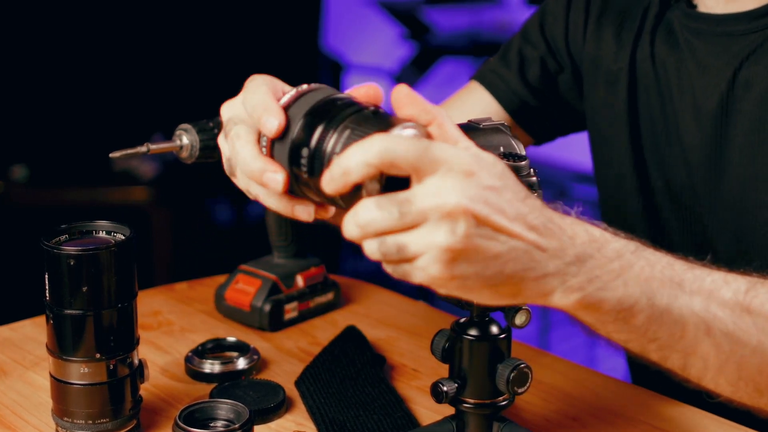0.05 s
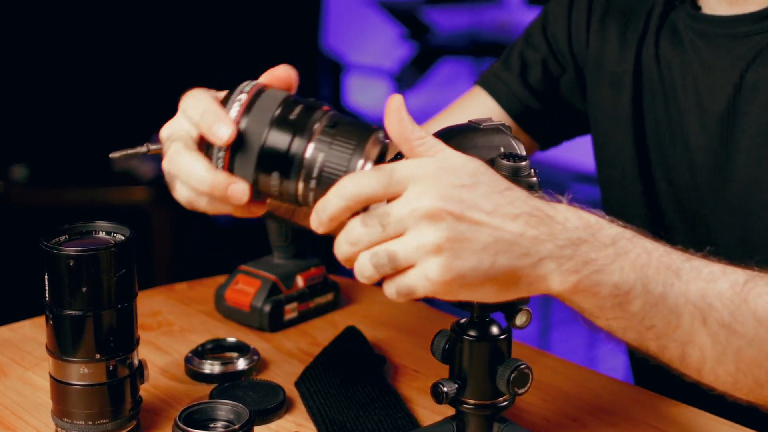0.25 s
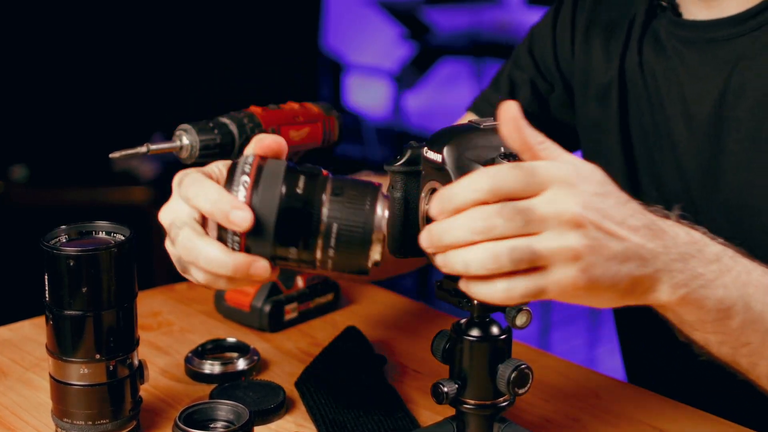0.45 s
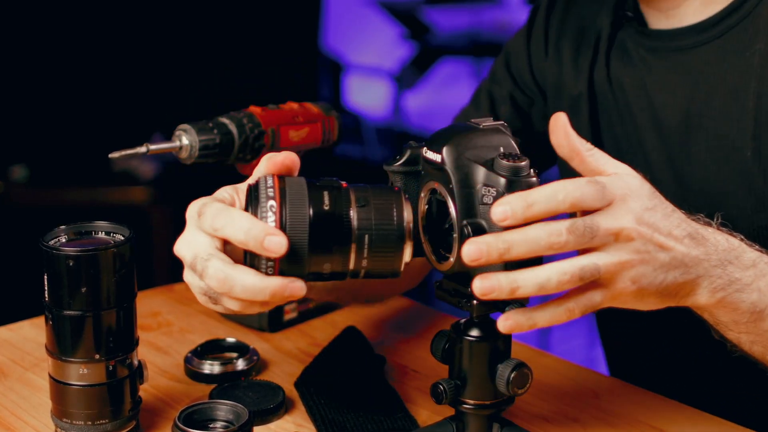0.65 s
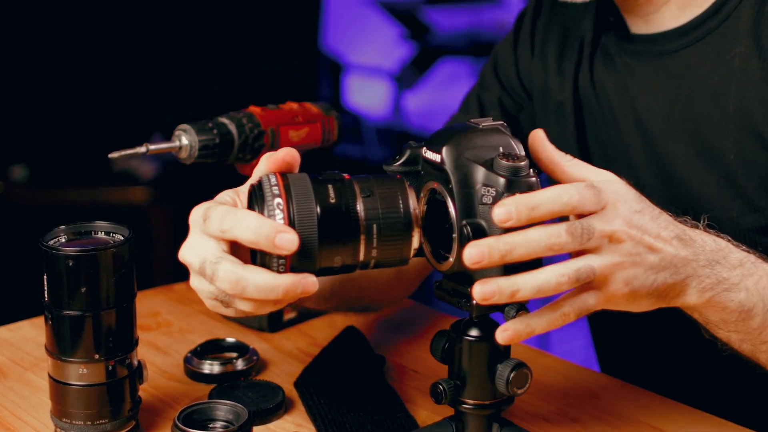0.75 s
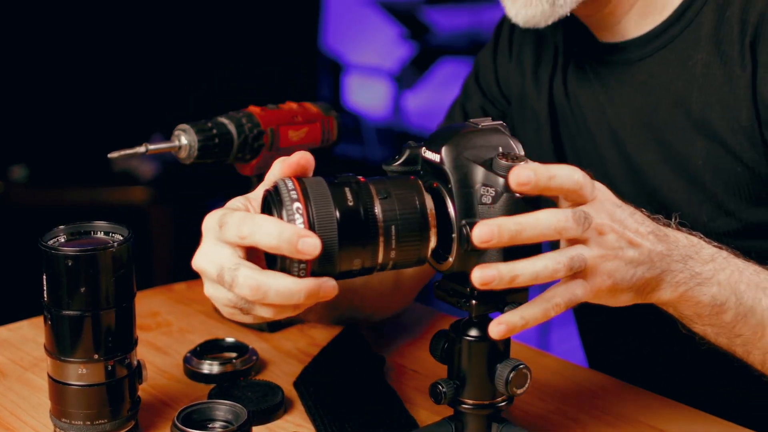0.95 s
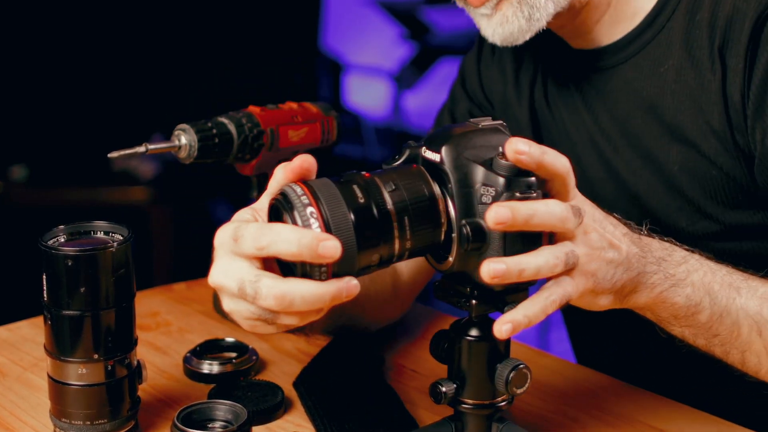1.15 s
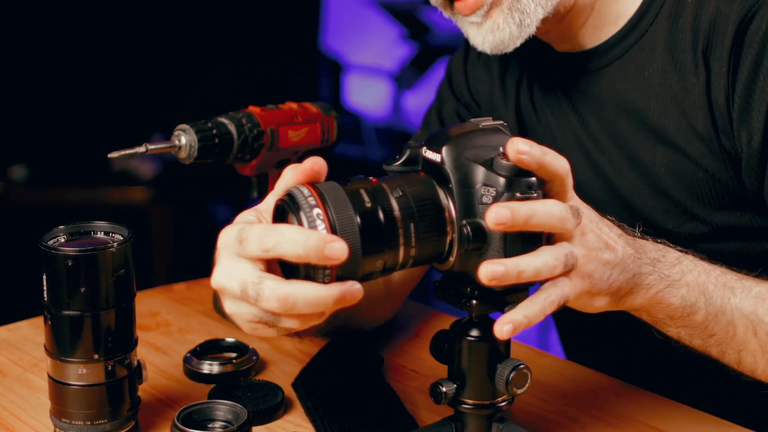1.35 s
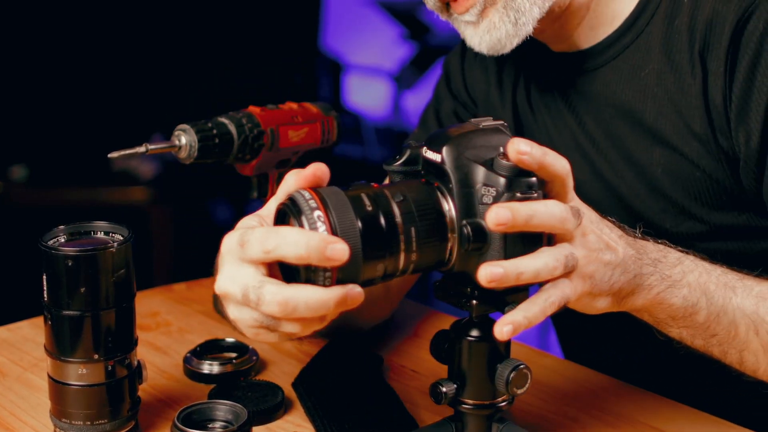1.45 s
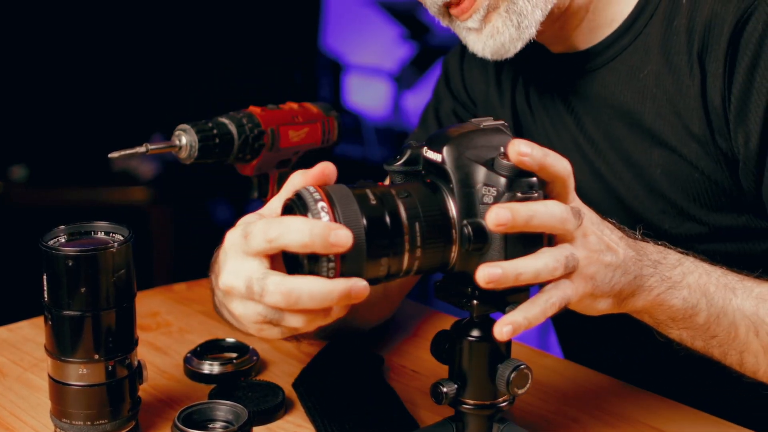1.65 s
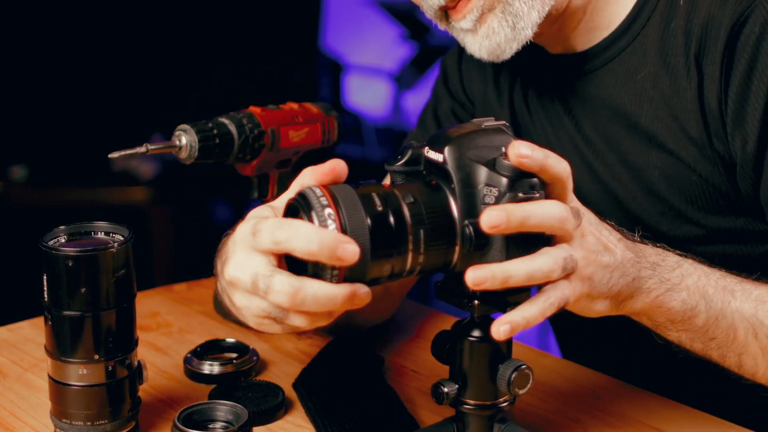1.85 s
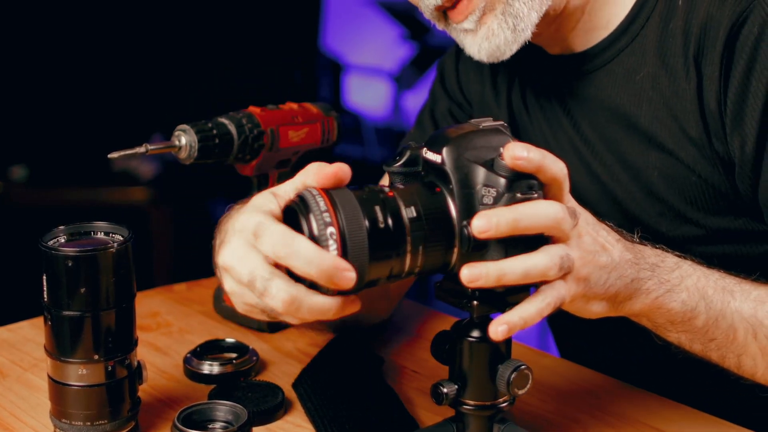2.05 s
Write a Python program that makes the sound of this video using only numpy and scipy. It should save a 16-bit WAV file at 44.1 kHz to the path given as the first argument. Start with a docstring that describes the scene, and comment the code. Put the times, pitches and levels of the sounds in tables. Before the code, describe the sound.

Camera lens fitting into its metal mount: a sharp snap, light scraping, then a hard locking click

```python
"""In a small room, a lens with an extension tube is fitted to a camera body close to the microphone. A catch
snaps, fingers tap hollow parts, and the bayonet seats, scrapes round and locks with a cluster of clacks.
Impacts are short noise bursts and dying sines coloured by the metal; scrapes are trains of random slips. The
room answers with early reflections and a diffuse tail, and the lock leaves lasting resonances ringing, over a
low rumble and faint hiss."""
import sys
import numpy as np
from scipy import signal
from scipy.fft import rfft, irfft
from scipy.io import wavfile
from scipy.ndimage import uniform_filter1d

SR = 44100
rng = np.random.default_rng(int(sys.argv[2]) if len(sys.argv) > 2 else 0)


def file_out(sig):
    """Save sig as 16-bit WAV at sys.argv[1]."""
    # one column per channel
    cols = np.atleast_2d(sig).T
    # limit, then scale
    lim = np.clip(cols, -1, 1)
    pcm = np.round(lim * 32767).astype(np.int16)
    wavfile.write(sys.argv[1], SR, pcm)


N = 93006  # samples

# Background spectrum, relative density per hertz: [f/Hz, level/dB]
AIR_SPECTRUM = [(18, -51), (30, -14), (59, -1), (100, 0), (245, -9), (303, -14), (461, -12.5), (988, -27),
                (1910, -30.5), (6720, -36.5), (10800, -28), (16000, -36.5)]
# Background side signal relative to its mid: [f/Hz, level/dB]
AIR_SIDE_SPECTRUM = [(30, -42), (100, -25), (1000, -23.5), (4000, -21.5), (10000, -9), (16000, -8)]
AIR_RMS_DB = -56.5  # rms of the mid, before the low cut

# Reverberation decay: [f/Hz, t60/s]
ROOM_DECAY = [(100, 1), (500, 0.28), (1100, 0.2347), (2000, 0.3443), (5000, 0.3032), (9000, 0.41),
              (15000, 0.2)]
# Reverberation strength: [f/Hz, level/dB]
ROOM_STRENGTH = [(100, 1.5), (500, -7.5), (1200, -3), (2200, -9.5), (4000, -11), (9000, -9.5), (15000, -1)]
EARLY_DB, EARLY_T60_S, EARLY_DELAY_S, TAIL_DELAY_S = -15.5, 0.031, 0.003, 0.006
HAND_ROOM_DB, MOUNT_ROOM_DB = -9, -1.5  # share of each source sent to the room

# Fingers on hollow parts: [t/s, pitch f/Hz, level/dB, t60/s, thud level/dB, tick level/dB]
FINGER_TAPS = [(0.7947, 746, 6.5, 0.018, -10.5, -20.5), (0.9798, 1082, 4.5, 0.027, -3, -29)]
# Colour of the tick in each tap: [f/Hz, level/dB]
TAP_TICK_COLOUR = [(400, -19.5), (1300, 2.5), (2400, 0), (3000, -16), (3900, -5), (4400, -12), (5000, -3),
                   (6500, -20), (16000, -24)]
# Light ticks of the grip: [t/s, level/dB, centre f/Hz, width/octaves]
GRIP_TICKS = [(0.3251, -16, 7600, 0.21), (0.6696, -26, 6880, 0.3), (0.9406, -30.5, 1534, 1),
              (2.0369, -17.5, 1490, 0.43), (2.0995, -22.5, 6900, 0.95)]
# Skin brushing and pressing on the housing: [t/s, length/s, level/dB, centre f/Hz, width/octaves]
SKIN_BRUSHES = [(0.25, 0.096, -57.5, 7920, 0.39), (0.661, 0.038, -54, 2244, 0.31),
                (1.573, 0.034, -34, 270, 0.45), (1.938, 0.047, -29.5, 205, 0.33)]
THUD_HZ, THUD_T60_S = 510, 0.019  # low thud under each tap
FINGER_SOFT_HZ, TICK_T60_S = 1390, 0.0087

# The catch snapping: [t/s, level/dB, dense ring t60/s]
CATCH_SNAP = (0.0224, 0, 0.012)
# Colour of its dense ring: [f/Hz, level/dB]
CATCH_COLOUR = [(100, -31), (280, -39.5), (440, -4), (660, -20), (1250, 7), (1650, 1.5), (2500, 4),
                (3700, 5.5), (6000, 3), (8500, 9.5), (12000, 5.5), (15500, -1)]
# Its clear modes: [f/Hz, level/dB, t60/s]
CATCH_MODES = [(875, 12, 0.031), (2040, 20.5, 0.016), (2734, 8.36, 0.016), (3040, 18.3, 0.013),
               (4470, 12.5, 0.013), (5310, 9, 0.022), (5830, 8.3, 0.018), (6970, 12, 0.0083),
               (8000, 18.3, 0.014), (8980, 17, 0.04)]
# Its spring, singing on: [f/Hz, level/dB, t60/s]
CATCH_SPRING_MODES = [(2005, 18, .45), (2470, 16, .48), (2633, 13.5, .45), (5141, 11, .4), (7200, 7, 0.35)]
# What the catch throws into the room: [f/Hz, level/dB]
CATCH_SPILL = [(100, -23), (650, -4), (1000, 0.5), (1600, 1), (2100, 14), (3000, 12.5), (3800, 10),
               (5300, 12), (9000, 11.5), (15500, -7)]

# Bayonet contacts: [t/s, level/dB, bass/dB, treble/dB, t60/s, favoured band f/Hz, band level/dB]
BAYONET_CLACKS = [(1.1804, -5.5, 5, 4, 0.013, 3110, 9.5), (1.1977, -7.5, 8, 1.5, 0.0074, 3180, 8.5),
                  (1.2050, -16.5, 4, 5, 0.015, 6220, 8), (1.2866, -13.5, 9, -4, 0.015, 1700, 6),
                  (1.2961, -15, 7.5, -12, 0.015, 2900, -15), (1.4052, -12, 8.5, -7.5, 0.017, 2840, 11.5),
                  (1.4107, -18, -2, -7, 0.019, 820, 8.5), (1.4625, -21.5, 11, -2, 0.0093, 2120, 3),
                  (1.6056, -2.5, 2.5, -1, 0.011, 4520, 11), (1.6128, -6.5, -18, 0, 0.033, 4600, 2),
                  (1.6261, -3, -12, -7.5, 0.033, 4530, -1), (1.6316, 5.5, -3.5, -5, 0.019, 5960, 4.5),
                  (1.6525, 5, 1, 1, 0.013, 4570, 5), (1.6600, 0.5, 3.5, -11, 0.031, 905, 10),
                  (1.6614, 1.5, -4.5, 7.5, 0.016, 1760, 5.5), (1.7660, -3.5, -11, -11.5, 0.022, 2360, 4),
                  (1.7690, -14, -11, -12, 0.028, 1170, 13.5)]
# Metal sliding on metal: [t/s, length/s, level/dB, treble/dB, favoured band f/Hz]
METAL_SCRAPES = [(0, 0.027, -43, 17, 2700), (1.255, 0.062, -42, -2.5, 2900),
                 (1.389, 0.061, -53.5, -5.5, 2980), (1.432, .05, -41.5, -15.5, 2150),
                 (1.588, 0.068, -38, -5.5, 4520), (1.659, 0.047, -39, -44, 890),
                 (1.901, 0.12, -55, -13, 4700)]
# Overall colour of the barrel: [f/Hz, level/dB]
BARREL_TINT = [(70, -21), (170, -4), (320, 2), (900, -1), (1500, -1.5), (2500, -0.5), (3900, -3.5),
               (7500, -5), (10000, -12.5), (15500, -28)]
# Damped resonances of the barrel: [f/Hz, half width/Hz, level/dB]
BARREL_RESONANCES = [(315, 45, 5), (450, 35, 3), (790, 65, 7), (1030, 50, 3), (2210, 80, 5), (2930, 90, 5),
                     (3380, 90, 4), (4500, 130, 7), (5860, 130, 7)]
# The thump of the lock: [t/s, level/dB]
LOCK_THUMP = (1.661, 4.8)
# Resonances set ringing by the thump of the lock, from a low boom up into the treble: [f/Hz, level/dB, t60/s]
LOCK_MODES = [(99, 16, .6), (161, 16, .5), (112, 12, .12), (150, 6, .07), (330, 4, .3), (431, 4, .3),
              (662, 9, .28), (771, 8, .28), (918, 10, .22), (1313, 12, .28), (4609, 10, .14)]
BASS_HZ, TREBLE_HZ, BAND_HALF_WIDTH_HZ = 540, 5330, 210
CONTACT_RISE_S, LOCK_RISE_S, CHATTER_S = 0.00053, 0.013, 0.0016
# Firmer scrapes have denser slips, lighter scrapes sparser ones; the rate holds at the firm level
GRAINS_PER_S, FIRM_DB, GRAIN_SPREAD_DB = 1500, -37, 2.5
SCRAPE_PEAK = 0.68  # fraction of the scrape at which the push is greatest
SCRAPE_BASS_DB, SCRAPE_BAND_DB, SCRAPE_T60_S = 2.3, 3.5, 0.015

LOW_CUT_HZ, EDGE_HZ = 71, 15850


def amp(db):
    """Level: decibels become an amplitude ratio."""
    return 10 ** (np.asarray(db) / 20)


def read(points, hz):
    """Interpolation: a curve is read along a logarithmic frequency axis."""
    f, value = np.transpose(points)
    return np.interp(np.log(hz + 1), np.log(f + 1), value)


def add(mix, s, sound):
    """Superposition: a sound is summed into the mix from time s, in seconds."""
    part = mix[max(round(s * SR), 0):][:len(sound)]
    part += sound[:len(part)]


def bins(size=4096):
    """Discrete spectrum: the frequencies on which colours are drawn."""
    return np.fft.rfftfreq(size, 1 / SR)


def causal(db):
    """Minimum phase: the Hilbert transform of log gain gives the most compact causal response."""
    mirrored_db = np.r_[db, db[-2:0:-1]]
    log_gain = np.log(amp(np.maximum(mirrored_db, -100)))
    return np.fft.ifft(np.exp(np.conj(signal.hilbert(log_gain)))).real


def hump(centre, width):
    """Band-pass colour: level in dB falls away on either side of a centre, by octaves."""
    octaves = np.log2((bins() + 1) / centre)
    return -10 * np.log10(1 + (octaves / width) ** 4)


def soften(x, rise_s=CONTACT_RISE_S):
    """Onset: a vibration builds up linearly over its rise time."""
    t = np.arange(len(x)) / SR
    return x * np.minimum(t / rise_s, 1)


def burst(t60, hold=0., size=4096, count=4):
    """High modal density: countless brief modes act as whitened noise, held and then decaying."""
    t = np.arange(size) / SR
    x = rng.standard_normal(size) * amp(-60 * np.maximum(t - hold, 0) / t60)
    for _ in range(count):  # each pass evens the smoothed spectrum towards unity
        power = uniform_filter1d(abs(rfft(x)) ** 2, size=30)
        flatten = causal(-10 * np.log10(abs(power) + 1e-9))
        x = irfft(rfft(x) * rfft(flatten))
    return x


def ring(modes, size=30000):
    """Modal superposition: decaying sines of alternating sign, each set by its resonance height."""
    t = np.arange(size) / SR
    total = np.zeros(size)
    for k, (hz, db, t60) in enumerate(modes):
        height_to_amplitude = 2 * np.log(1000) / (t60 * SR)
        decay = amp(db - 60 * t / t60)
        total += (-1) ** k * height_to_amplitude * decay * np.sin(2 * np.pi * hz * t)
    return total


def air():
    """Stationary noise: shaped rumble and hiss, whose stereo width grows towards the treble."""
    mid, side = rfft(rng.standard_normal((2, N))) * amp(read(AIR_SPECTRUM, bins(N)))
    side = irfft(side * amp(read(AIR_SIDE_SPECTRUM, bins(N))), N)
    mid = irfft(mid, N)
    return amp(AIR_RMS_DB) / mid.std() * (mid + np.array([side, -side]))


def room(x, size=32768):
    """Reverberation: quick reflections off the table, then a diffuse tail decaying band by band."""
    hz, t, z = signal.stft(rng.standard_normal(size), SR, nperseg=256)
    t60 = read(ROOM_DECAY, hz)[:, None]
    decay = amp(read(ROOM_STRENGTH, hz)[:, None] - 60 * t / t60)
    unit_energy = np.sqrt(2 * np.log(1000) / (t60 * SR))
    diffuse = signal.istft(z * decay * unit_energy, SR, nperseg=256)[1]
    response = np.zeros(size)
    add(response, TAIL_DELAY_S, diffuse)
    add(response, EARLY_DELAY_S, amp(EARLY_DB) * burst(EARLY_T60_S))
    return signal.fftconvolve(x, response)[:N]


def hands():
    """Soft excitation: fingertips low-pass the hollow taps; ticks and brushes are banded noise."""
    out = np.zeros(N)
    fingertip = causal(-10 * np.log10(1 + (bins() / FINGER_SOFT_HZ) ** 8))
    for s, pitch, db, t60, thud_db, tick_db in FINGER_TAPS:
        hollow = ring([(pitch, db, t60), (THUD_HZ, thud_db, THUD_T60_S)])
        add(out, s, signal.fftconvolve(hollow, fingertip))
        tick = signal.fftconvolve(burst(TICK_T60_S), causal(read(TAP_TICK_COLOUR, bins())))
        add(out, s, amp(tick_db) * tick)
    for s, db, centre, width in GRIP_TICKS:
        tick = signal.fftconvolve(burst(TICK_T60_S), causal(hump(centre, width)))
        add(out, s, amp(db) * tick)
    for s, length, db, centre, width in SKIN_BRUSHES:
        swell = np.hanning(round(length * SR))
        friction = swell * rng.standard_normal(len(swell))
        add(out, s, amp(db) * signal.fftconvolve(friction, causal(hump(centre, width))))
    return out


def catch():
    """Impulsive release: a sprung catch excites its modes and spring; a broader crack fills the room."""
    near, spill = np.zeros((2, N))
    s, db, t60 = CATCH_SNAP
    dense = signal.fftconvolve(burst(t60), causal(read(CATCH_COLOUR, bins())))
    add(near, s, soften(dense))
    add(near, s, soften(ring(CATCH_MODES) + ring(CATCH_SPRING_MODES)))
    add(spill, s, causal(read(CATCH_SPILL, bins())))
    return amp(db) * (near + room(spill))


def barrel(bass_db, treble_db, band_hz, band_db):
    """Resonant response: heavier contact adds bass, harder adds treble, and its place favours a band."""
    hz = bins()
    level = read(BARREL_TINT, hz)
    for centre, width, db in BARREL_RESONANCES + [(band_hz, BAND_HALF_WIDTH_HZ, band_db)]:
        level = level + db / (1 + ((hz - centre) / width) ** 2)
    bass = bass_db / (1 + (hz / BASS_HZ) ** 2)
    treble = treble_db * (1 - 1 / (1 + (hz / TREBLE_HZ) ** 4))
    return causal(level + bass + treble)


def clacks():
    """Impact: each lug contact chatters for a moment and rings the barrel."""
    out = np.zeros(N)
    for s, db, bass_db, treble_db, t60, band_hz, band_db in BAYONET_CLACKS:
        answer = barrel(bass_db, treble_db, band_hz, band_db)
        knock = signal.fftconvolve(burst(t60, CHATTER_S), answer)
        add(out, s, amp(db) * soften(knock))
    return out


def lock_thump():
    """Modal excitation: the thump of the lock sets resonances ringing, from a low boom up into the treble."""
    out = np.zeros(N)
    s, db = LOCK_THUMP
    add(out, s, amp(db) * soften(ring(LOCK_MODES), LOCK_RISE_S))
    return out


def scrapes():
    """Stick-slip friction: random slips of either sign excite the barrel as the push swells and eases."""
    out = np.zeros(N)
    for s, length, db, treble_db, band_hz in METAL_SCRAPES:
        slipping = rng.random(N) < GRAINS_PER_S * amp(db - FIRM_DB) / SR
        sign = rng.choice([-1, 1], N)
        strength = amp(GRAIN_SPREAD_DB * np.minimum(rng.exponential(1, N), 3))
        slips = slipping * sign * strength
        progress = np.arange(0, length, 1 / SR) / length
        push = np.sqrt(np.interp(progress, [0, SCRAPE_PEAK, 1], [0, 1, 0]))
        grains = push * slips[:len(push)] / slips.std()
        drive = signal.fftconvolve(grains, burst(SCRAPE_T60_S))
        answer = barrel(SCRAPE_BASS_DB, treble_db, band_hz, SCRAPE_BAND_DB)
        add(out, s, amp(db) * signal.fftconvolve(drive, answer))
    return out


def bayonet():
    """Superposed contacts: the lugs knock, slide grain by grain and hit the stop."""
    return clacks() + lock_thump() + scrapes()


def scene():
    """Direct and reverberant fields: central handling sounds, each with its share of room, over the air."""
    mix = air() + catch()
    for source, room_db in [(hands(), HAND_ROOM_DB), (bayonet(), MOUNT_ROOM_DB)]:
        mix = mix + source + amp(room_db) * room(source)
    return mix


def record(dry):
    """Band limiting: the microphone's low cut, then the recorder's upper edge."""
    low_cut = signal.butter(4, LOW_CUT_HZ, "high", fs=SR, output="sos")
    x = signal.sosfilt(low_cut, dry)
    edge = signal.firwin(511, EDGE_HZ, window=("kaiser", 9), fs=SR)
    return signal.oaconvolve(x, edge[None], "same")


dry = scene()
out = record(dry)
file_out(out)
```